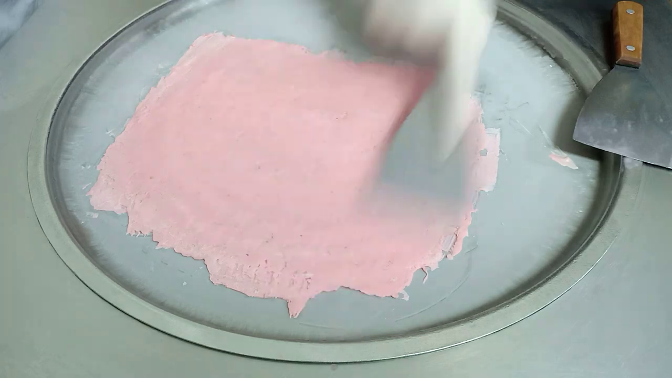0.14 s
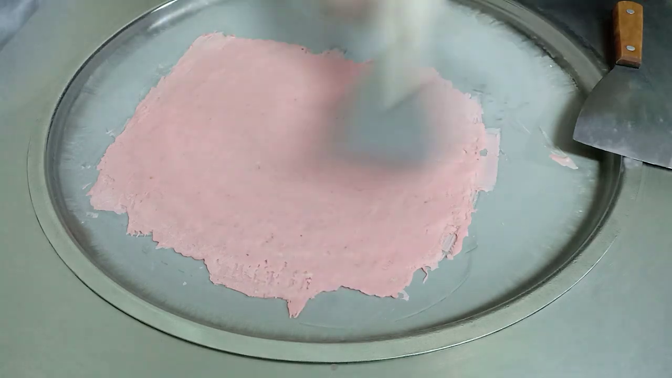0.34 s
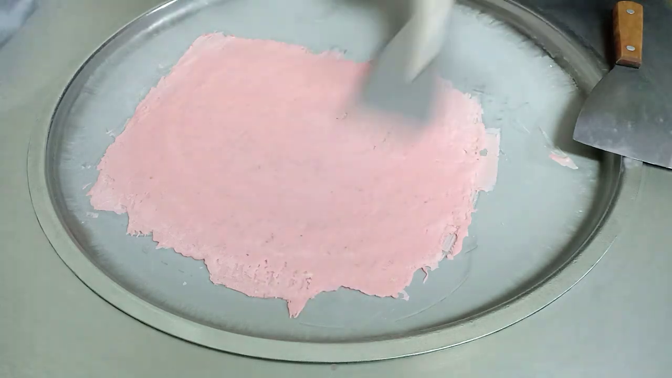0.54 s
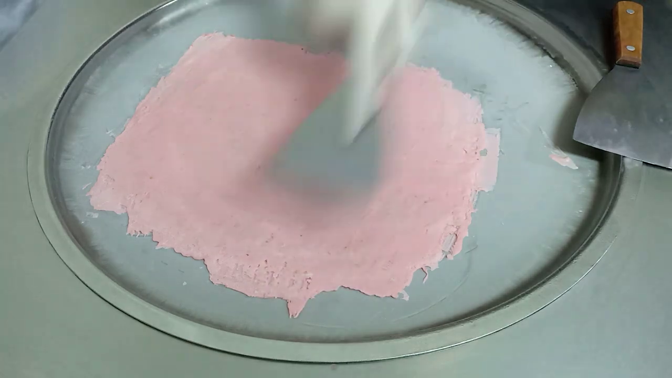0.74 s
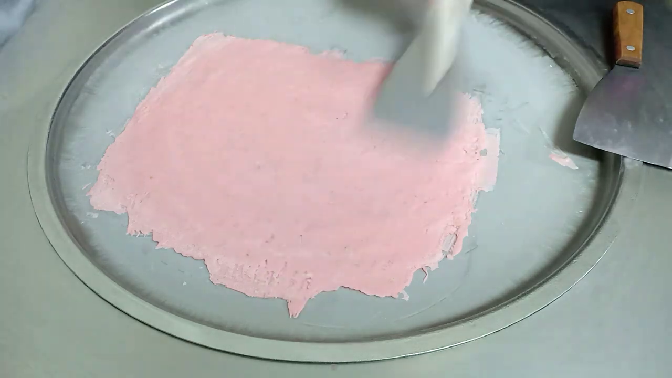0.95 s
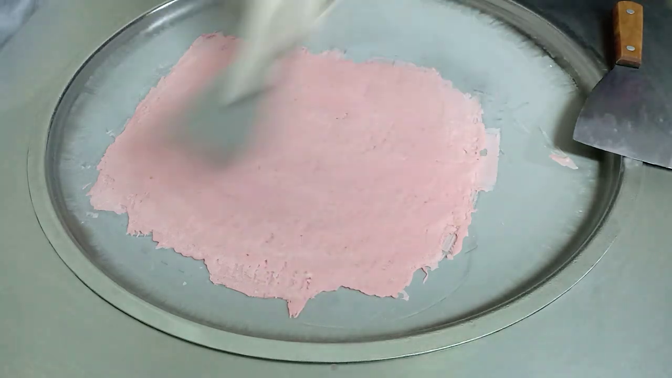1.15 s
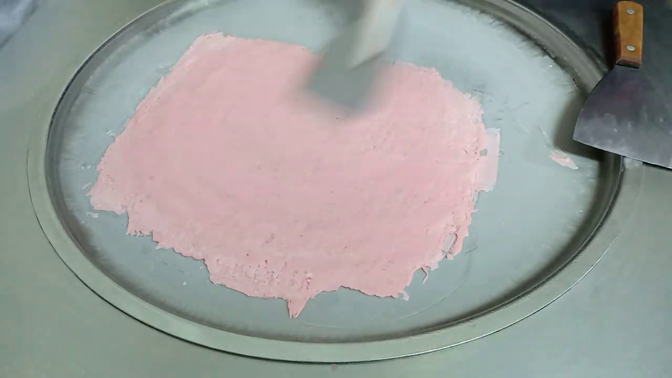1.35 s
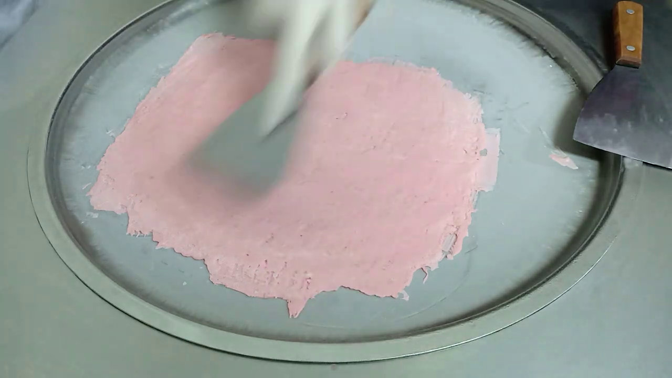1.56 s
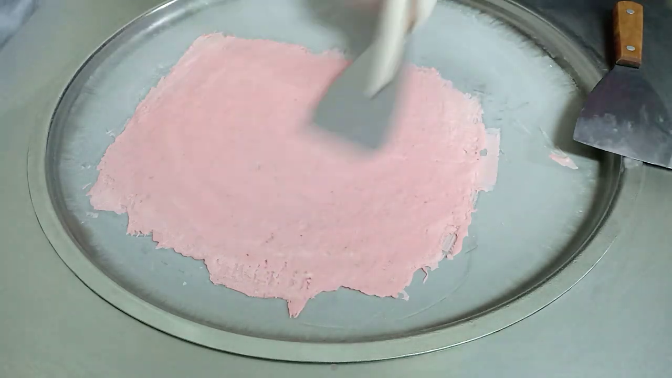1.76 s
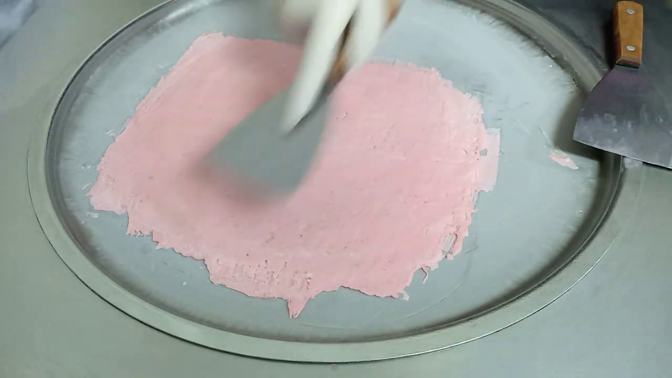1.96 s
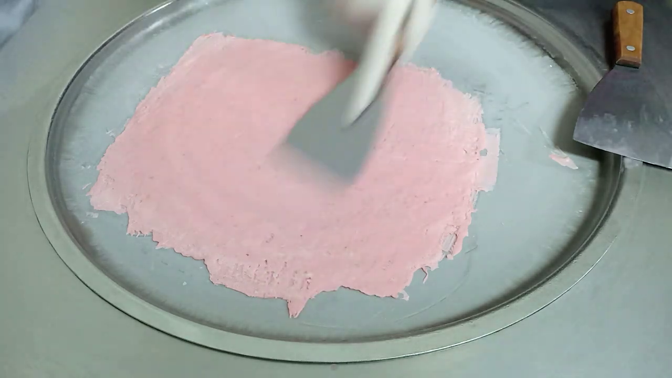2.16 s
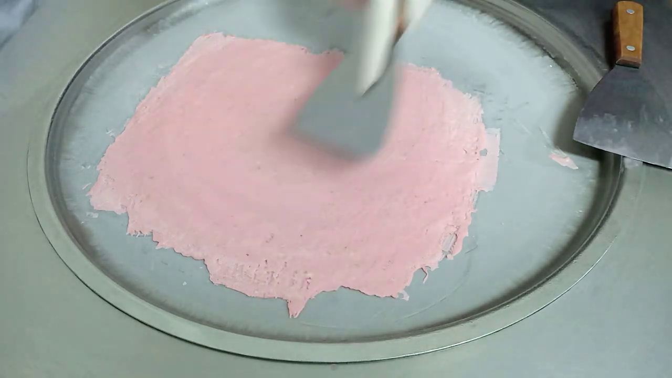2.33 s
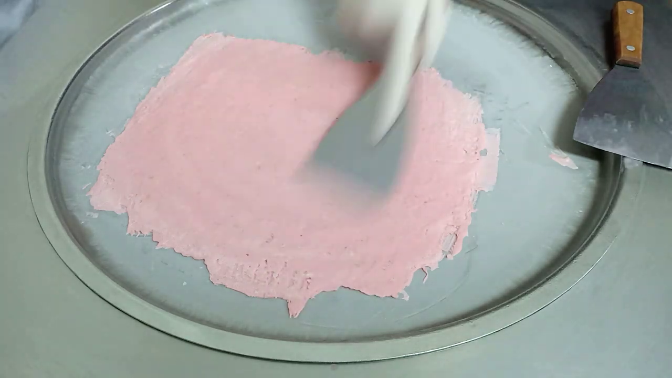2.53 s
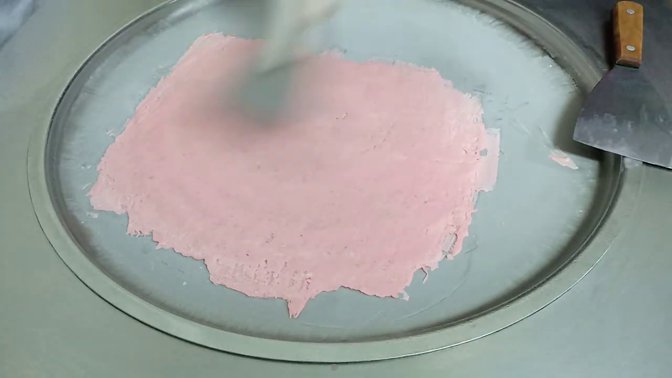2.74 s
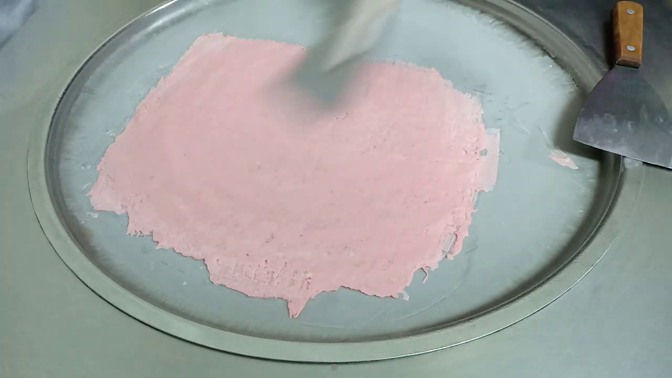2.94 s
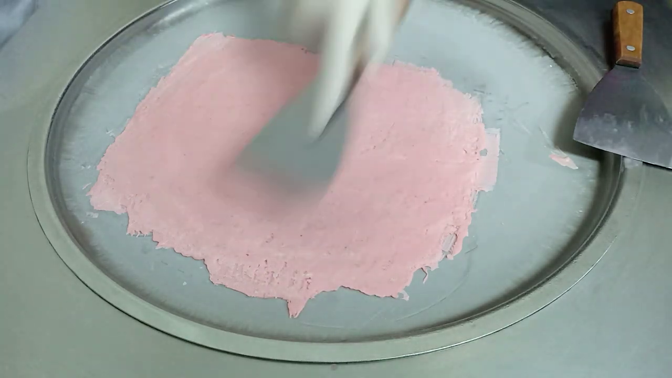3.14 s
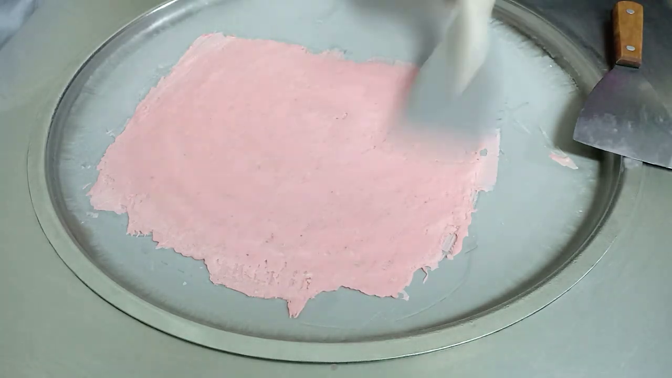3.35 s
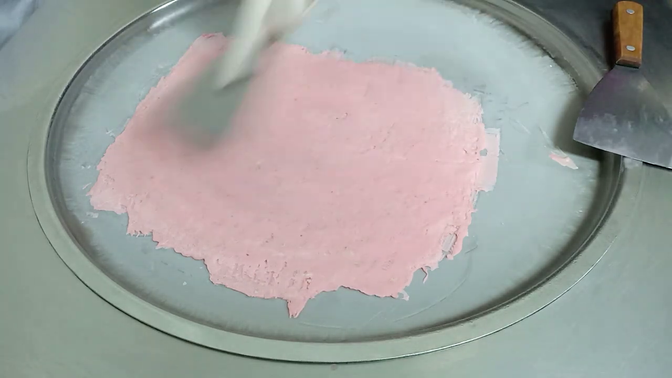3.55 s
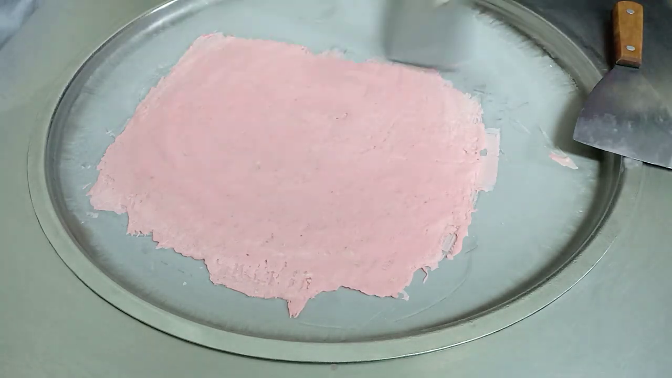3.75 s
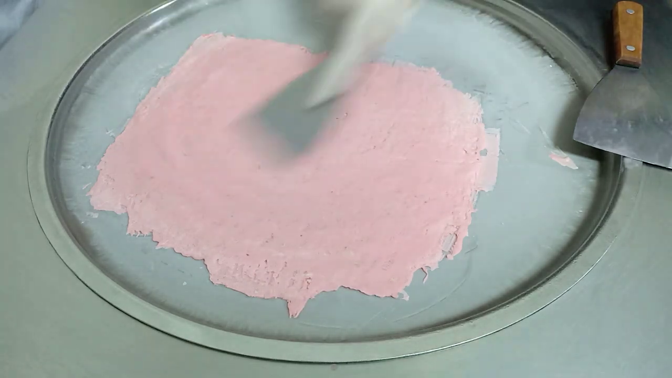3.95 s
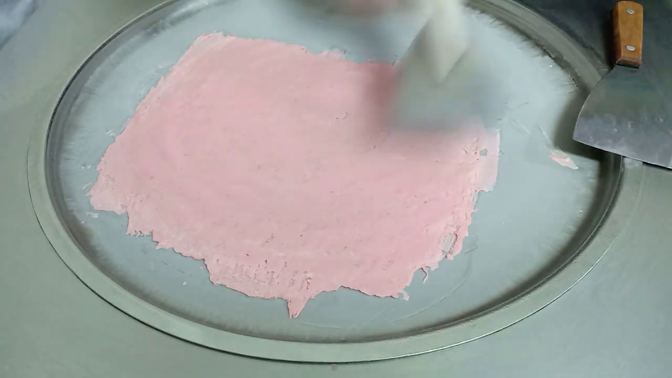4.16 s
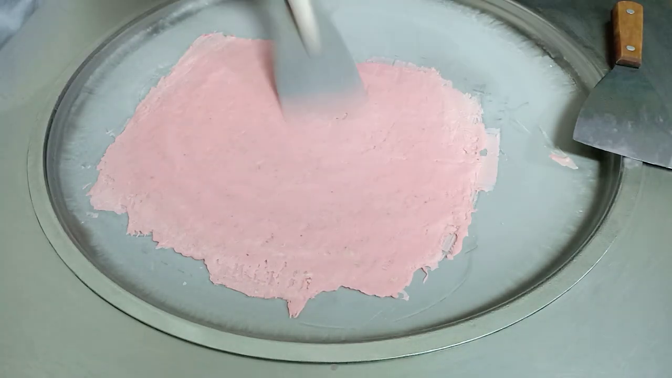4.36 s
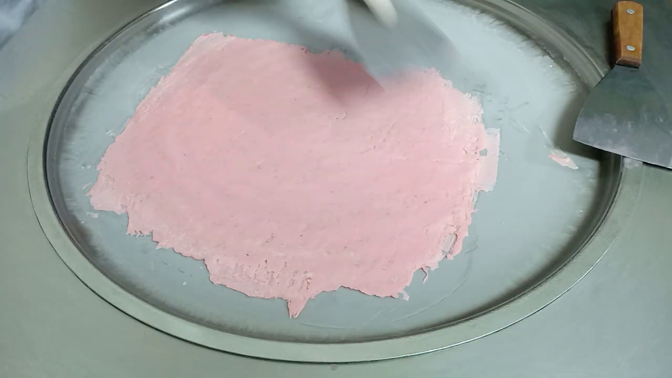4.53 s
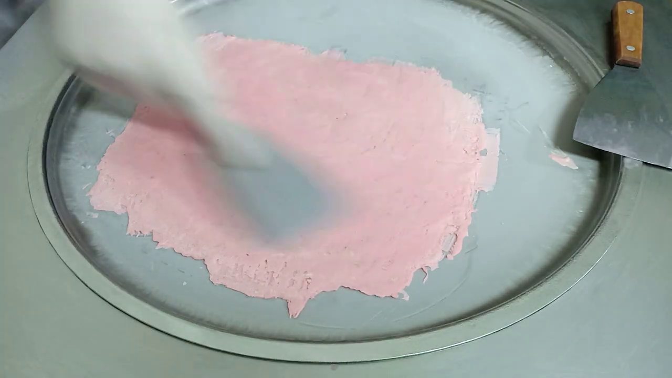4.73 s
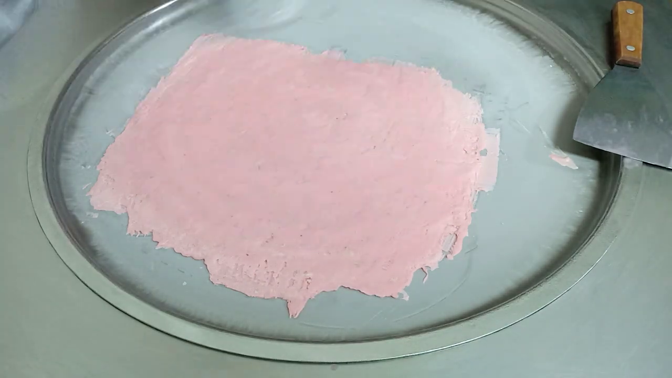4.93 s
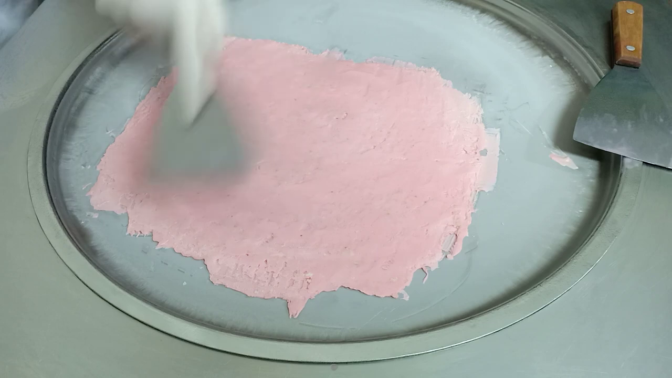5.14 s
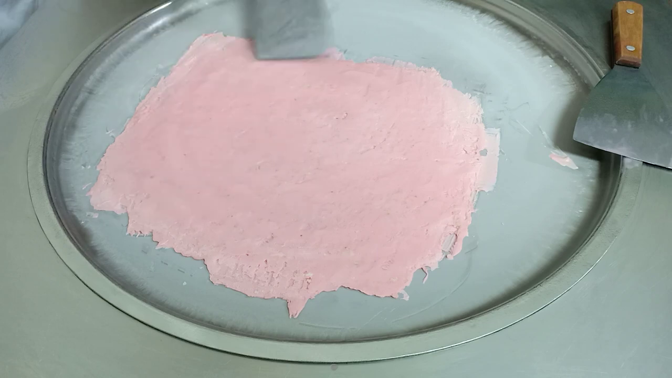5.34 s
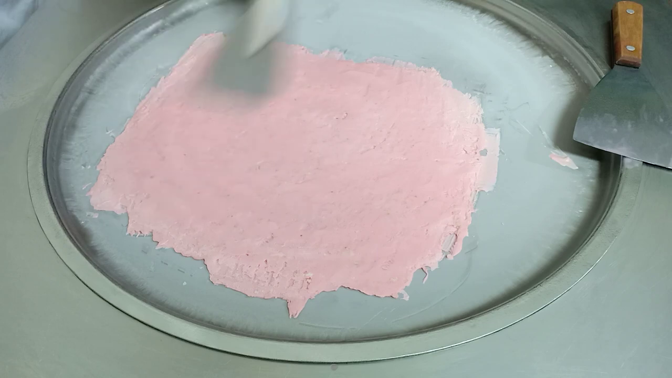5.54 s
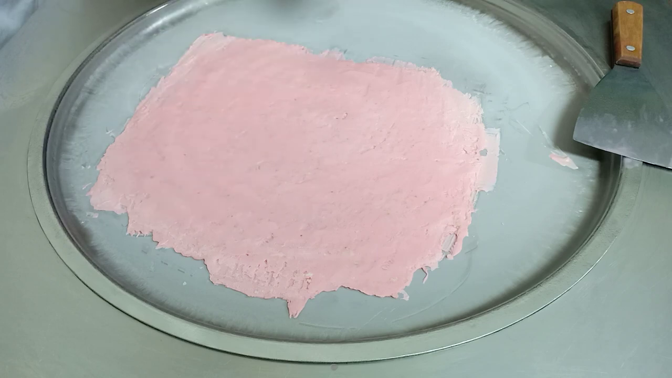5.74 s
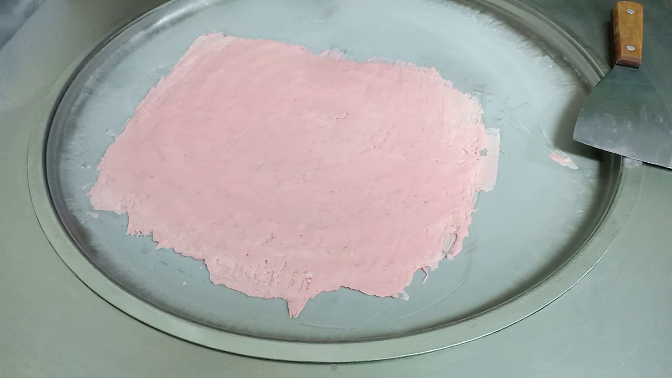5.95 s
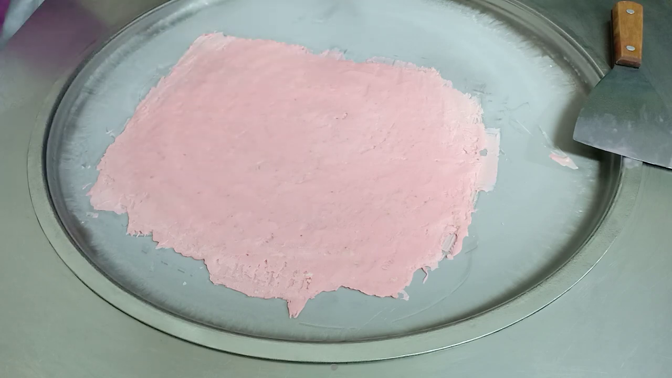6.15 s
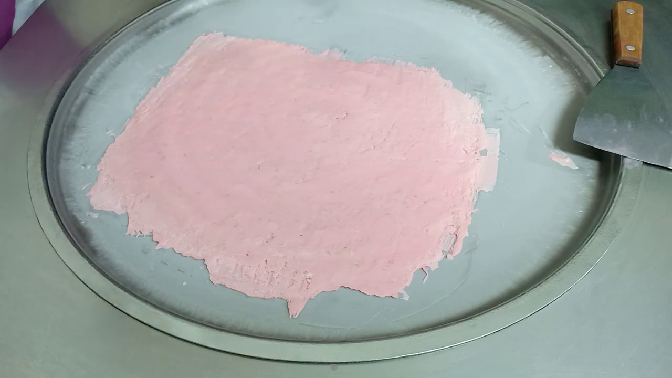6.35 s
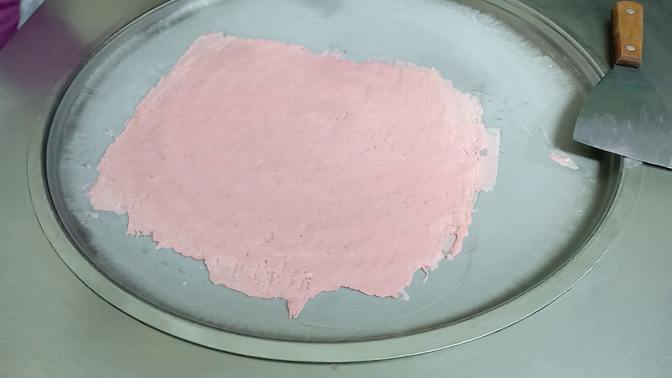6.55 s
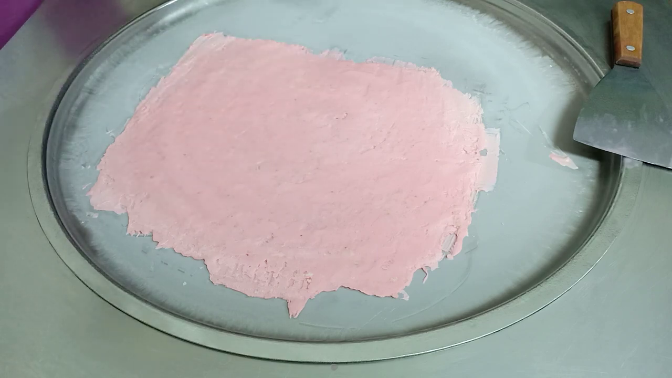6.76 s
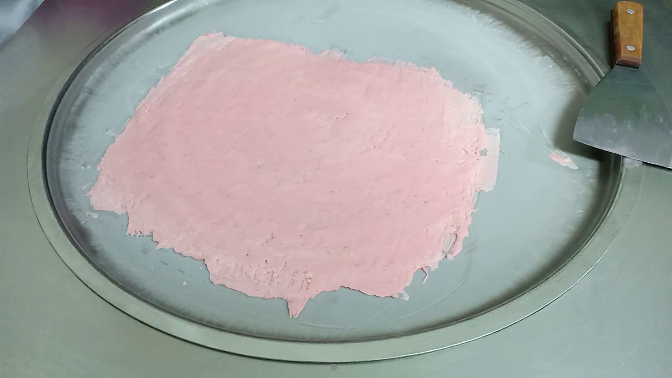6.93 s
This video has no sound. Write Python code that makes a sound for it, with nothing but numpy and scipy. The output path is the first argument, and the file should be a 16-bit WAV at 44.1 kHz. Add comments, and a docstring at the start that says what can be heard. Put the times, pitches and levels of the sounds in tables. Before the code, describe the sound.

Sharp, loud metal slaps land every four tenths of a second on a cold plate, with grainy drags and small blade clinks, then faint freezer hum.

```python
"""A flat steel spatula slaps down on frozen cream spread over a steel cold plate and drags across it.
Each slap is a short crack of noise; it shakes the plate's low modes and leaves a brief, uneven noise wash.
The drag is grainy noise that also makes the thin blade ring, and the blade's edge gives small knocks.
A freezer hums and hisses faintly and two soft ticks come from elsewhere in the room.
A phone above hears it all through two ports, left and right."""
import sys
import numpy as np
from scipy import signal
from scipy.fft import rfft, irfft
from scipy.io import wavfile
from scipy.ndimage import uniform_filter1d, map_coordinates

SR = 44100
rng = np.random.default_rng(int(sys.argv[2]) if len(sys.argv) > 2 else 0)


def write(x):
    x = np.atleast_2d(x).T
    wavfile.write(sys.argv[1], SR, np.round(np.clip(x, -1, 1) * 32767).astype(np.int16))

N = 308259
T = np.arange(N) / SR  # time of each sample, s
HZ = np.maximum(np.fft.rfftfreq(N, 1 / SR), 1)  # pitch of each frequency bin


def gain(db):
    """The factor that a level in dB stands for."""
    return 10 ** (np.asarray(db) / 20)


def unit(x):
    """Scales a sound to rms 1."""
    return x / np.sqrt(np.mean(x ** 2))


def along(table):
    """Reads a (Hz, value) table at every frequency bin, in straight lines over log pitch."""
    hz, value = np.transpose(table)
    return np.interp(np.log(HZ), np.log(np.maximum(hz, 1)), value)


def noise(colour):
    """Random noise shaped by a (Hz, dB) spectrum, rms 1."""
    return unit(irfft(rfft(rng.standard_normal(N)) * gain(along(colour)), N))


def walk(rate):
    """A smooth random wander: new levels at this rate (Hz), smoothed twice; spread near 1."""
    k = int(SR / rate)
    steps = np.repeat(rng.standard_normal(N // k + 1), k)
    return 1.48 * uniform_filter1d(uniform_filter1d(steps, k), k)[:N]


def ring(force, hz, t60):
    """One ringing mode; a steady noise force keeps its rms. It falls 60 dB in t60 seconds."""
    keep = 1000. ** (-1 / (t60 * SR))
    swing = signal.lfilter([1], [1, -keep * np.exp(2j * np.pi * hz / SR)], force)
    return np.sqrt(2 * (1 - keep ** 2)) * swing.imag


def burst(s, rise, t60):
    """Start sample and envelope of a rise followed by an exponential fall."""
    rise, t60 = max(rise, 1e-4), max(t60, .002)
    t = T[:int(SR * (rise + t60))]
    return int(s * SR), np.minimum(t / rise, 1) ** 1.42 * 1000. ** (-np.maximum(t - rise, 0) / t60)


def add(out, start, x):
    """Mixes x into out from a start sample on."""
    out[..., start:start + x.shape[-1]] += x[..., :N - start]


def peaked(x, hz, share, q):
    """Noise with a share of it sent through a resonance at hz."""
    resonant = signal.lfilter(*signal.iirpeak(hz, q, SR), x)
    return share * unit(resonant) + (1 - share) * unit(x)


def top_of(x):
    """Keeps what lies above 8.5 kHz."""
    return signal.sosfilt(signal.butter(4, 8500, "high", fs=SR, output="sos"), x)


# The blade's slaps, which also kick the plate. Each row: time in seconds, crack peak in dB before panning,
# crack centre in Hz, crack t60 (time to fall 60 dB) in seconds, thud on the plate in dB, brightening in dB,
# left minus right in dB, top sizzle in dB, rise in seconds.
SLAPS = [(0.0926, -0.5, 2280, 0.054, -24.5, -0.5, 1.5, 9.5, 0.0014),
         (0.483, -4, 1600, 0.037, -27, 3, -1, 3.5, 0.0017),
         (0.866, -1, 1870, 0.027, -29.5, 2, 1, 1, 0.0055),
         (1.285, -2.5, 4230, 0.025, -28, 3.5, 1, 4.5, 0.0038),
         (1.67, -3.5, 4250, 0.022, -29.5, 3, 0.5, 2, 0.005),
         (2.1, -6, 2070, 0.024, -30, -0.5, -2, 9, 0.0051),
         (2.513, -9, 2950, 0.041, -33.5, -2, 1, -8, 0.0035),
         (2.883, -13.5, 1630, 0.04, -26.5, 1, -4, -7, 0.0021),
         (3.261, -3.5, 1540, 0.064, -31, 5, 1, 5.5, 0.0011),
         (3.659, -5.5, 2170, 0.023, -25.5, 6.5, 4, -0.5, 0.003),
         (3.986, -4, 4250, 0.015, -29.5, 1.5, -1.5, -18, 0.0049),
         (4.2911, -2, 2100, 0.045, -26.5, 3.5, -1, 5, 0.0012),
         (4.695, -23, 2560, 0.023, -34.5, 5.5, 2, -10, 0.0016),
         (5.234, -1.5, 1650, 0.021, -30, 2, 3.5, 2, 0.002),
         (5.548, 0, 4920, 0.013, -25, 1, 3.5, -0.5, 0.0033)]


def slaps(source):
    """The flat blade lands unevenly: each short crack has its own rise, centre, tilt, sizzle and side."""
    out = np.zeros((2, N))
    # the slope of a sound is stronger in the treble; here it is even at 3 kHz
    brighter = np.diff(source, prepend=0) * SR / (2 * np.pi * 3000)
    top = top_of(source)
    for s, db, hz, t60, _, tilt_db, pan_db, sizzle_db, rise in SLAPS:
        start, shape = burst(s + 0.0019 - rise, rise, t60)  # every rise ends 1.9 ms after s
        part = slice(start, start + len(shape))
        tilted = source[part] + (gain(tilt_db) - 1) * brighter[part]
        crack = peaked(tilted, hz, .35, 3.5)
        crack = shape * (crack + (gain(sizzle_db) - 1) * top[part])
        sides = gain([[pan_db / 2], [-pan_db / 2]])
        add(out, start, crack * gain(db) / np.abs(crack).max() * sides)
    return out


# After each slap the blade drags off, then glides lightly back until it lifts. Each row: time in seconds,
# drag level in dB, drag t60 in seconds, glide level in dB, stroke length in seconds, extra weight on the
# plate in dB, extra blade ring in dB, extra top sizzle in dB, left behind right in milliseconds.
DRAGS = [(0.004, -48, 0.28, -51.5, .08, 8, -10, 5, .13),
         (0.145, -31.5, 0.81, -59.5, 0.35, 5.5, 2, -4, 0.082),
         (0.52, -33.5, 0.46, -51.5, 0.36, 2, 3, 0, 0.045),
         (0.899, -30, 0.29, -52.5, .375, 0.5, 0, -1, 0.098),
         (1.323, -34.5, 0.55, -53.5, 0.41, 2, 4, 3, -0.0058),
         (1.704, -35, 0.32, -56, 0.42, 2, -4, 2, 0.031),
         (2.139, -36.5, 0.24, -54, 0.47, -8.5, -8, 0, 0.033),
         (2.55, -33.5, 0.52, -55, 0.36, 1, 4, 0, 0.093), (2.92, -39, 0.89, -52, 0.34, -4, -3, 2, -0.048),
         (3.324, -30.5, 0.48, -47, 0.31, -4, 6.5, -1, 0.026),
         (3.7, -34.5, 0.84, -49.5, .275, 1.5, 0, -1, 0.06), (4.026, -37, 0.55, -49, 0.26, 3, 4, 0, 0.084),
         (4.332, -38.5, 0.24, -47, 0.35, -5.5, -7, 1, .13),
         (4.722, -43, 3.4, -52.5, 0.47, 5.5, -6, 6.5, 0.093),
         (5.268, -37, 0.64, -49, 0.3, -4, 4, -2, -0.048),
         (5.59, -35, 0.55, -59.5, 0.39, -0.5, -4.5, 2, .073)]
# In mid-stroke the blade turns and its edge scrapes again. Each row: time in seconds, level in dB,
# rise in seconds, hold in seconds, t60 in seconds, extra weight on the plate in dB, extra blade ring in dB,
# extra top sizzle in dB, left behind right in milliseconds.
TURNS = [(0.243, -33.5, 0.042, .03, 0.24, 1, 7.5, 6.5, .14), (0.599, -35, .03, .02, 0.11, 0.5, 5, 0, 0.088),
         (1.001, -41, .006, .045, .22, 5, -1, 1, 0.17),
         (1.418, -38.5, 0.0088, .02, 0.25, 3.5, -3, 3, 0.045), (1.777, -39, .008, .02, 0.39, 3.5, 1, 3, .1),
         (2.222, -42.5, .01, .03, .5, 1, -6, 2, 0.055), (2.633, -38.5, 0.0072, .05, 0.22, 4, -6, 3, 0.074),
         (2.994, -38.5, 0.023, .03, 0.25, 1.5, -7, 3, 0.15), (3.423, -32.5, .03, .03, 0.34, 0, 5, 3.5, .14),
         (3.813, -56.5, .03, .03, 0.42, -4.5, -7, 0, 0.045),
         (4.058, -31.5, .006, .01, 0.25, 3.5, -2, 0, .072),
         (4.398, -39, .006, .045, 0.27, 5.5, 2, -3, 0.025),
         (4.976, -27.5, 0.083, .015, 0.17, -1.5, 6.5, 1, -0.053),
         (5.344, -37, 0.013, .03, 0.26, 2, -4, -2, 0.055)]
# What each motion usually drives. Each holds: weight on the plate, blade ring, top sizzle, in dB against its rasp.
DRAG_DRIVE, GLIDE_DRIVE, TURN_DRIVE = (-1, -1, -21), (3, -5.5, -19), (0, 0, -20.5)
DRAG_RISE_S, GLIDE_RISE_S, LIFT_FADE_S = 0.034, .05, .01


def drives(db, usual_db, own_db):
    """Power of the rasp, then of the three things it drives."""
    return gain(db + np.r_[0, np.add(usual_db, own_db)])[:, None] ** 2


def drags():
    """Strength of rasp, plate weight, blade ring and sizzle: all motions add up in power."""
    power = np.zeros((4, N))
    for s, db, t60, glide_db, length, *own_db, _ in DRAGS:
        down = np.clip((s + length - T) / LIFT_FADE_S + 1, 0, 1) ** 2
        rise = np.clip((T - s) / DRAG_RISE_S + 1, 0, 1) ** 2  # complete at s
        fall = 1e6 ** (-np.maximum(T - s, 0) / t60)  # in power, so 1e6 is 60 dB
        glide = np.clip((T - s) / GLIDE_RISE_S, 0, 1) ** 2
        drag_power = drives(db, DRAG_DRIVE, own_db) * rise * fall
        glide_power = drives(glide_db, GLIDE_DRIVE, own_db) * glide
        power += down * (drag_power + glide_power)
    for s, db, rise, hold, t60, *own_db, _ in TURNS:
        swell = np.clip((T - s) / rise + 1, 0, 1) ** 3
        fall = 1e6 ** (-np.maximum(T - s - hold, 0) / t60)
        power += drives(db, TURN_DRIVE, own_db) * swell * fall
    return np.sqrt(power)


# Colour of the rasping edge. Each row: pitch in Hz, relative level in dB per Hz.
RASP = [(35, -60.5), (60, -24), (165, -3), (326, -5), (874, -19.5), (1430, -18.5), (1810, -18), (2640, -16),
        (3420, -25), (5470, -22.5), (8150, -37.5), (13400, -43.5), (15400, -45), (16500, -76.5)]


def rasp(strength, sizzle):
    """The edge catches on ice crystals: uneven noise grains, sparse sharper ticks, hard frost on top."""
    grains = gain(3.63 * walk(50) + 1.0 * walk(300))
    catches = (rng.random(N) < 150 / SR) * gain(1.8 * rng.exponential(size=N))  # about 150 a second
    catches = signal.lfilter([1], [1, -.99], catches)  # each dies away
    grit = unit((grains + 0.35 * catches) * noise(RASP))
    top = top_of(grit)
    return strength * (grit - top) + sizzle * unit(top)


# Ringing modes of the blade, used by its ring and its knocks. Each row: pitch in Hz, relative level in dB,
# t60 in seconds.
BLADE = [(1440, 0, .065), (2300, -12, .035), (2740, -5, .075), (4300, -18, .03), (5450, -12, .06)]
BLADE_SLAP_DB, BLADE_DRAG_DB = -17.5, -17  # how strongly slaps and drags drive the blade


def blade(cracks, chime):
    """The thin blade rings after slaps and sings in patches while it drags."""
    out = 0
    for hz, db, t60 in BLADE:
        patches = gain(BLADE_DRAG_DB + 2.93 * walk(24.97))
        rub = chime * patches * rng.standard_normal(N)
        out = out + gain(db) * ring(gain(BLADE_SLAP_DB) * cracks + rub, hz, t60)
    return out


# Small knocks of the blade edge. Each row: start in seconds, knock peak in dB, centre in Hz,
# share at the centre from 0 to 1, extra ring in dB.
KNOCKS = [(0.1962, -17.5, 1380, 0.7, -6), (0.26, -20, 2030, 0.7, 2), (0.5898, -26, 1460, 1, -3),
          (0.914, -24, 1440, 0.9, 7), (1, -27.5, 1450, 0.8, 3), (1.0403, -33, 1440, 0.85, 9),
          (1.365, -28.5, 1440, 1, 3), (1.419, -22.5, 1380, 0.7, 1.5), (1.777, -21.5, 1370, 0.8, 1.5),
          (2.222, -30.5, 1464, 0.9, 2), (2.633, -26, 1440, 0.9, -1), (3.0031, -39, 1420, 0.7, 12),
          (3.3189, -16.5, 1460, 0.4, 0), (3.412, -25.5, 1490, 0.4, -2), (3.4325, -24, 1470, 0.95, 8),
          (4.0554, -20, 1393, 0.9, -2), (4.397, -24, 1450, 0.4, -3), (4.4536, -29, 2700, 0, -3),
          (4.697, -26.5, 2660, 0.7, 8), (4.7833, -38, 2380, 0.7, 0), (4.953, -20, 1418, 0.7, -1),
          (4.9763, -19, 2855, 0, 9), (5.0316, -37.5, 2710, 0.6, 14), (5.345, -21, 1660, 0.36, -4),
          (5.3699, -22.5, 1440, 0.96, -1), (5.5109, -46, 2117, 0.7, 2.5)]
BLADE_KNOCK_DB = -10  # how strongly a knock drives the blade


def knocks(source):
    """The edge catches for an instant and sets the nearest blade mode ringing."""
    out = np.zeros(N)
    modes = np.array(BLADE)
    for s, db, hz, share, ring_db in KNOCKS:
        start, shape = burst(s, 0.00063, 0.013)
        knock = shape * peaked(source[start:start + len(shape)], hz, np.clip(share, 0, 1), 2.1)
        add(out, start, knock * gain(db) / np.abs(knock).max())
        mode_hz, mode_db, t60 = modes[np.argmin(abs(modes[:, 0] - hz))]
        start, fade = burst(s, 0.0035, t60)
        tone = np.sin(2 * np.pi * (mode_hz * T[:len(fade)] + rng.random()))
        add(out, start, fade * tone * gain(db + mode_db + ring_db + BLADE_KNOCK_DB))
    return out


# Low modes of the steel plate. Each row: pitch in Hz, relative level in dB, t60 in seconds.
PLATE = [(87, -17, 0.093), (124.1, -13, 0.93), (145.4, -23, 0.14), (158.9, -8.5, 0.59), (167, -4, 0.99),
         (187, -34, 0.21), (218.4, -24, 0.78), (237, -9.5, 0.406), (262.2, -11, 0.91), (306.8, -11, 0.65),
         (322.8, -7, 0.85), (335, -11.5, 0.8), (349.4, -18, 1), (415, -20.5, 0.39), (434.7, -12.5, 1),
         (453, -14, 0.57), (479, -23.5, 0.24), (514, -19, 0.63), (527, -16.5, 0.2), (578, -14.5, 0.42),
         (596.5, -13.5, 0.48), (627, -12, 0.51), (647, -13.5, 0.31), (680, -16, 0.42), (713, -17.5, .3),
         (746, -17.5, 0.36), (817, -26, 0.36)]
PLATE_SLAP_DB, PLATE_DRAG_DB = -10.5, -7  # how strongly slaps and drags drive the plate
PLATE_WANDER = .028  # typical pitch bend, as a share of the pitch


def plate(weight):
    """Slaps kick each low mode by a different amount; the drag feeds them and their pitch wanders."""
    out = 0
    place = rng.standard_normal((len(SLAPS), len(PLATE), 2))
    for k, (hz, db, t60) in enumerate(PLATE):
        push = gain(PLATE_DRAG_DB) * weight * rng.standard_normal(N) + 0j
        for row, (size, turn) in zip(SLAPS, place[:, k]):
            start, shape = burst(row[0], 0.0016, 0.012)
            kick = gain(row[4] + PLATE_SLAP_DB + 2 * size)
            add(push, start, shape * np.exp(2j * np.pi * turn) * kick)
        # let the swing die away first, then spin it at the wandering pitch
        keep = 1000. ** (-1 / (t60 * SR))
        swing = np.sqrt(2 * (1 - keep ** 2)) * signal.lfilter([1], [1, -keep], push)
        phase = 2 * np.pi * hz / SR * np.cumsum(1 + PLATE_WANDER * walk(9))
        out = out + gain(db) * (swing * np.exp(1j * phase)).imag
    return out


# Colour of cracks, knocks and wash before further shaping. Each row: pitch in Hz, relative level in dB per Hz.
CRACK = [(35, -36), (60, -16), (219, -18.5), (586, 1), (1110, -7), (1470, -2), (2350, 4.5), (3420, -5),
         (4750, 1), (7600, -18.5), (10100, -29), (11600, -22), (14000, -27.5), (16500, -39.5)]
# How long the wash lasts. Each row: centre of an octave-wide band in Hz, t60 in seconds.
WASH_T60 = [(200, 0.55), (400, 0.86), (800, 0.48), (1600, 0.36), (3200, 0.31), (6400, 0.24), (11500, 0.32)]
WASH_DB = -8.5


def wash(cracks):
    """The plate's dense upper modes and the near walls: a noise tail fed by each crack's energy."""
    out, dense, shared_swell = 0, noise(CRACK), walk(70)
    for hz, t60 in WASH_T60:
        band = signal.butter(2, [hz / 2 ** .5, hz * 2 ** .5], "band", fs=SR, output="sos")
        keep = 1e6 ** (-1 / (t60 * SR))
        fed = uniform_filter1d(signal.sosfilt(band, cracks) ** 2, 200, origin=99)  # recent energy
        stored = signal.lfilter([1 / 200], [1, -keep], fed)
        lumps = gain(1.6 * shared_swell + 1.2 * walk(60))  # the tail swells and dips unevenly
        out = out + lumps * np.sqrt(np.abs(stored)) * unit(signal.sosfilt(band, dense))
    return gain(WASH_DB) * out


# Colour of the freezer's hiss. Each row: pitch in Hz, relative level in dB per Hz.
FREEZER = [(25, -14), (60, -2.5), (100, -5.5), (140, -6.5), (200, -5.5), (403, -11.5), (464, -7.5),
           (544, -13.5), (878, -12.5), (1090, -17.5), (2330, -12.5), (3340, -23), (3920, -16.5),
           (7430, -32), (14900, -38.5), (16500, -42.5)]
FREEZER_DB, HUM_HZ, HUM_DB = -59, 120, -62.5  # typical rms levels in dB, hum pitch in Hz


def freezer():
    """Fan hiss that drifts a little, and the compressor's wavering hum."""
    tone = np.sin(2 * np.pi * HUM_HZ * T + .2 * walk(4.3))
    hum = tone * 2 ** .5 * gain(HUM_DB + walk(5.79))
    return gain(FREEZER_DB + .7 * walk(1)) * noise(FREEZER) + hum


# Faint ticks from elsewhere in the room. Each row: start in seconds, peak in dB, centre in Hz.
TICKS = [(6.163, -44.5, 5320), (6.359, -48.5, 11100)]


def ticks():
    """Short soft clicks of noise through a broad resonance."""
    out = np.zeros(N)
    for s, db, hz in TICKS:
        start, shape = burst(s, 0.0012, 0.022)
        tick = shape * signal.lfilter(*signal.iirpeak(hz, 1.2, SR), rng.standard_normal(len(shape)))
        add(out, start, tick * gain(db) / np.abs(tick).max())
    return out


# Level step between the ports. Each row: pitch in Hz, left minus right in dB.
PORT_BALANCE = [(60, 2.5), (110, 0.5), (200, -1.5), (380, -1.5), (700, -2.5), (1290, -1), (2380, -1.5),
                (4400, -4.5), (8120, 4.5), (15000, -2.5)]


def ports(shared, unshared, likeness):
    """Two ports: a part of the sound that both hear alike, the rest opposed, and a level step."""
    like = np.clip(along(likeness), 0, 1)
    step = gain(along(PORT_BALANCE) / 2)
    mid = np.sqrt((1 + like) / 2) * rfft(shared)
    side = np.sqrt((1 - like) / 2) * rfft(unshared)
    return irfft((mid + side * np.array([[1], [-1]])) * np.array([step, 1 / step]), N)


def lagged(pair):
    """The blade's place, moving between drag and turn, makes one port hear it a little later."""
    places = [(row[0] - DRAG_RISE_S, row[-1]) for row in DRAGS]
    places = sorted(places + [(row[0], row[-1]) for row in TURNS])
    lag = np.interp(T, *np.transpose(places)) * SR / 2000  # ms to samples, half for each port
    return np.array([map_coordinates(x, [np.arange(N) - sign * lag], order=4)
                     for x, sign in zip(pair, (1, -1))])


# How alike the ports hear the near blade and the spread-out sounds. Each row: pitch in Hz,
# left-right likeness (coherence) from 0 to 1.
NEAR_LIKENESS = [(30, 1), (200, 0.99), (600, 0.68), (2000, 0.45), (3500, 0.5), (6000, 0.41), (16000, 0)]
SPREAD_LIKENESS = [(30, 0.91), (120, .99), (300, 0.93), (600, 0.54), (1000, 0), (4000, 0.12), (16000, 0)]


def scene():
    """Every source is sounded twice with fresh chance, for the shared and the unshared part."""
    grit, weight, chime, sizzle = drags()
    near, spread = [], []
    for _ in range(2):
        cracks = slaps(noise(CRACK))
        centre = cracks.mean(axis=0)
        near.append(cracks + knocks(noise(CRACK)) + blade(centre, chime) + rasp(grit, sizzle))
        spread.append(wash(centre) + plate(weight) + freezer() + ticks())
    return lagged(ports(*near, NEAR_LIKENESS)) + ports(*spread, SPREAD_LIKENESS)


TOP_HZ, OFFSET = 16600, .001  # treble limit; shift off zero as a share of full scale


def record(dry):
    """The phone drops the deepest bass, clips at full scale, cuts the top and sits slightly off zero."""
    thin = signal.sosfilt(signal.butter(2, 60, "high", fs=SR, output="sos"), dry)
    clipped = np.clip(thin, -1, 1)
    return signal.sosfilt(signal.ellip(10, .2, 90, TOP_HZ, fs=SR, output="sos"), clipped) + OFFSET


dry = scene()
out = record(dry)
write(out)
```